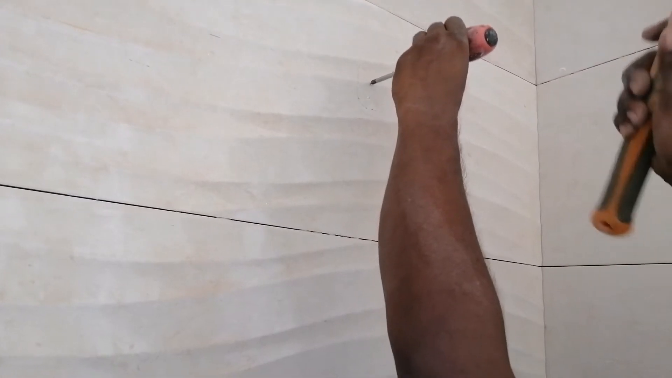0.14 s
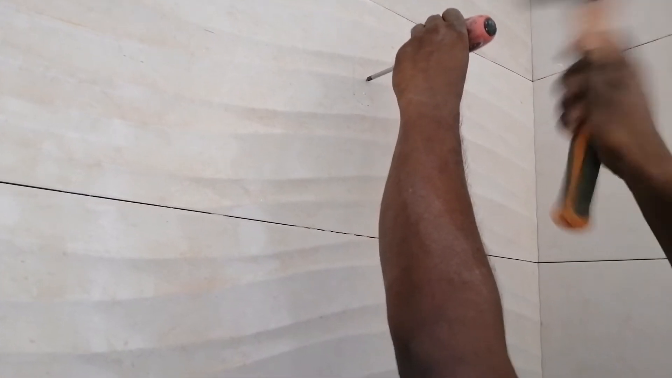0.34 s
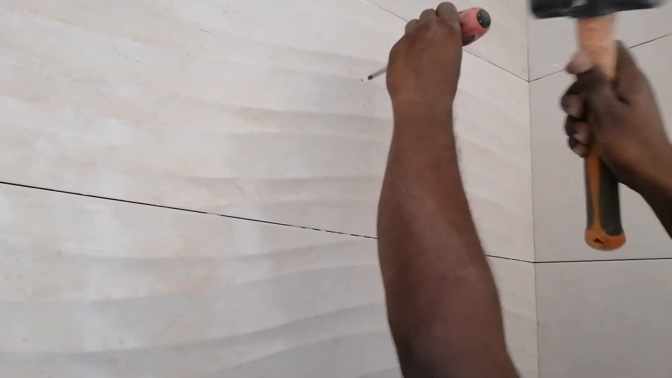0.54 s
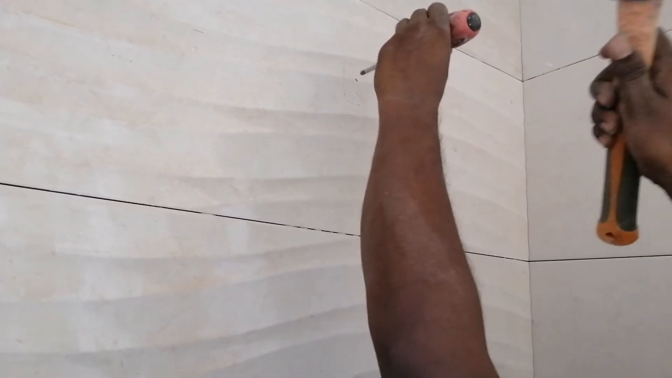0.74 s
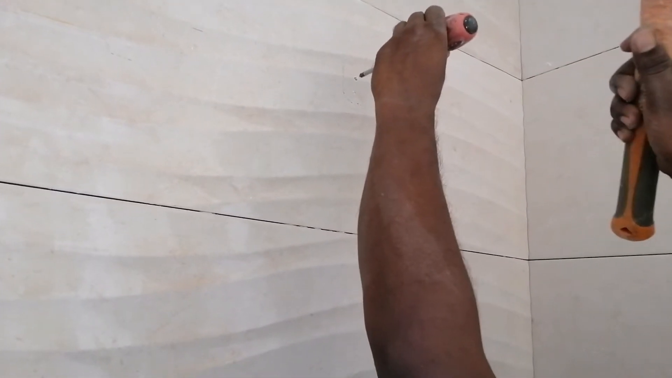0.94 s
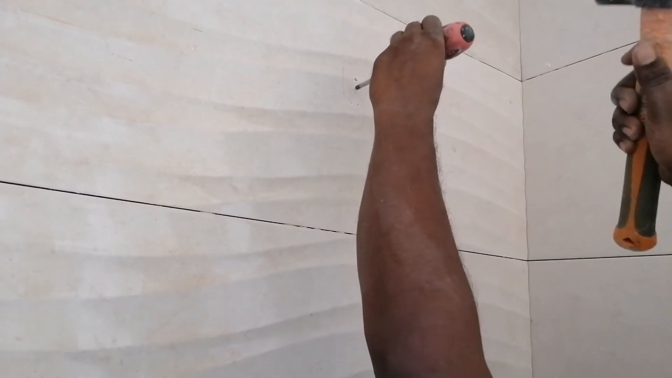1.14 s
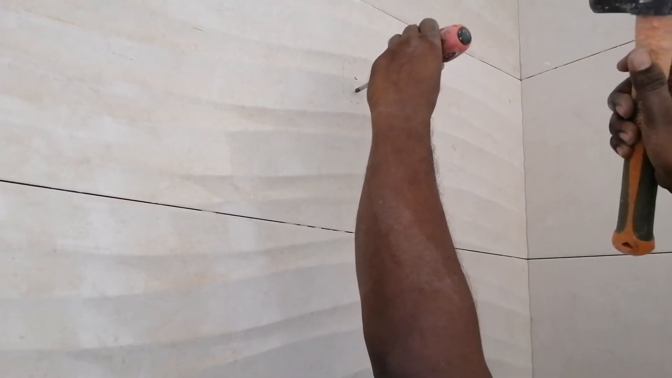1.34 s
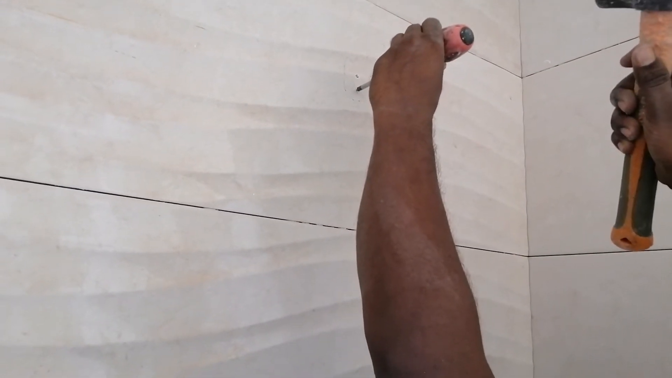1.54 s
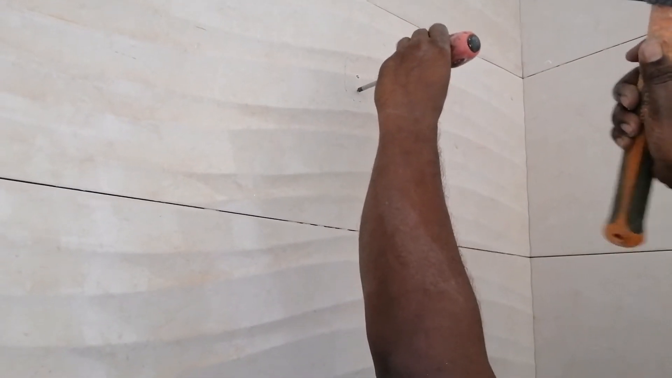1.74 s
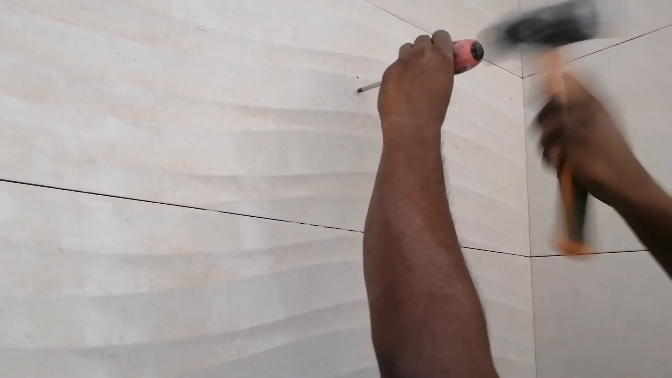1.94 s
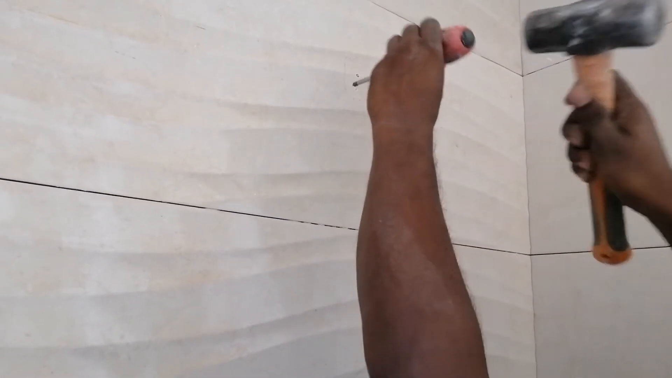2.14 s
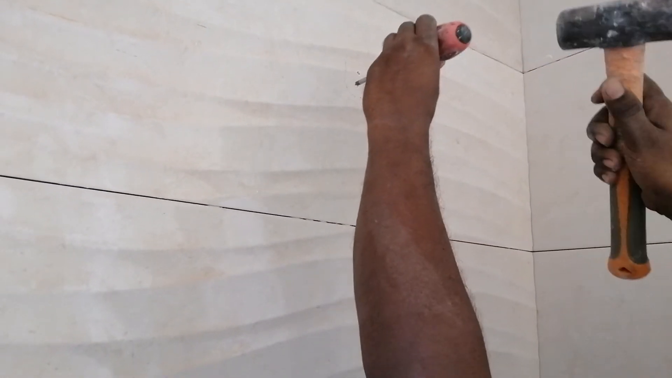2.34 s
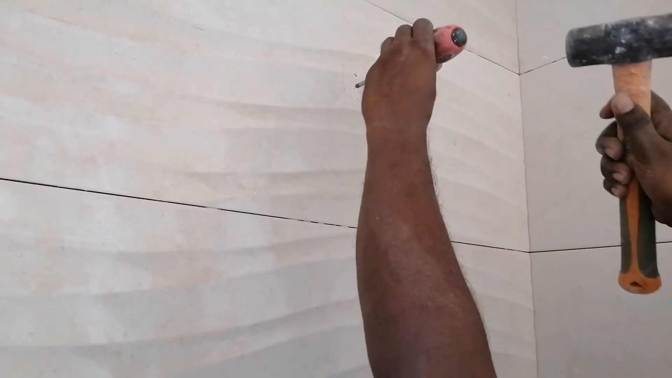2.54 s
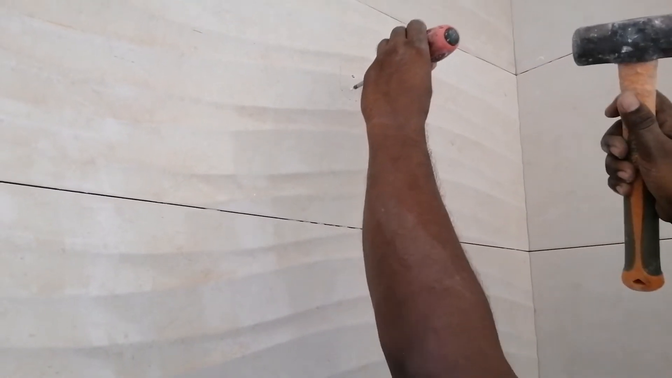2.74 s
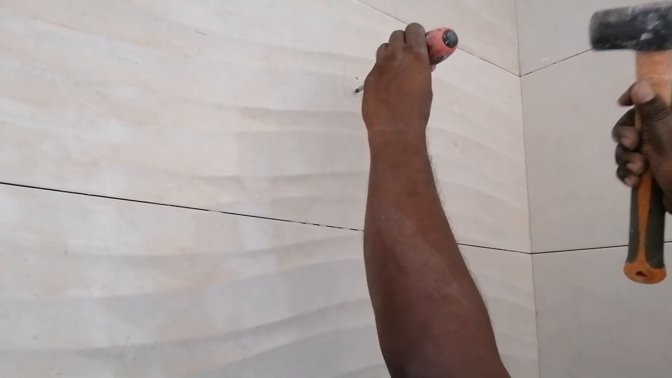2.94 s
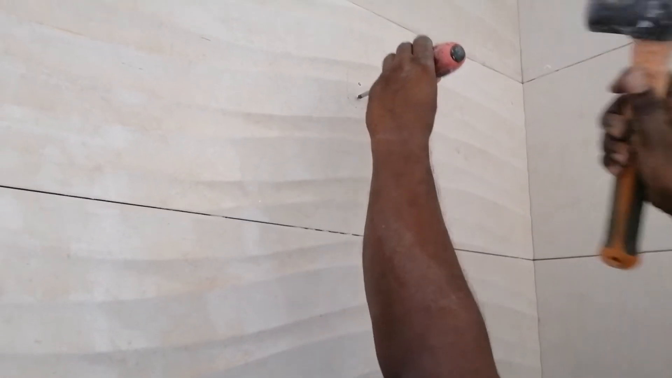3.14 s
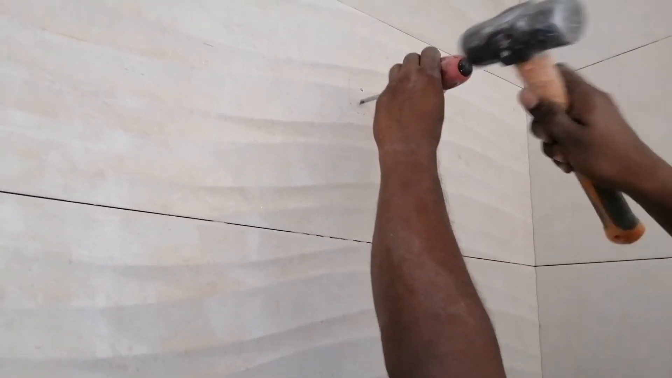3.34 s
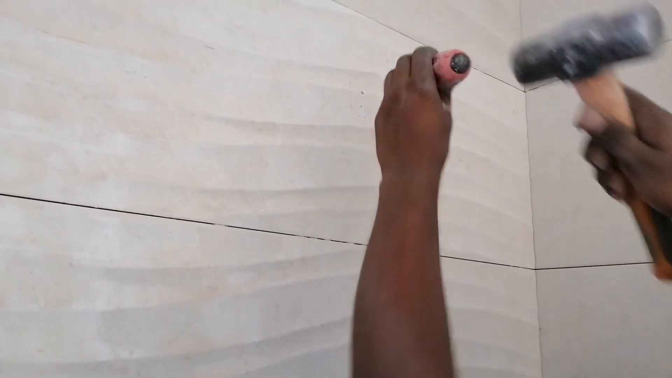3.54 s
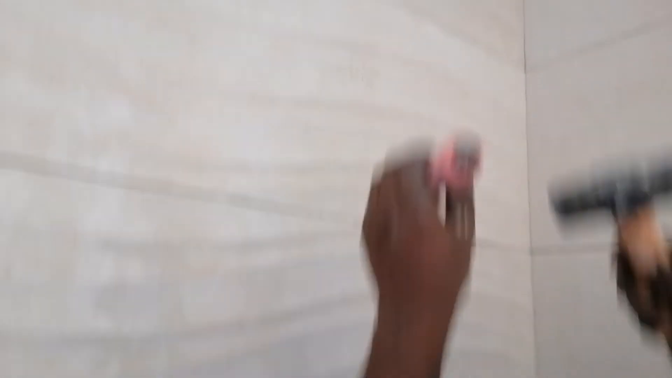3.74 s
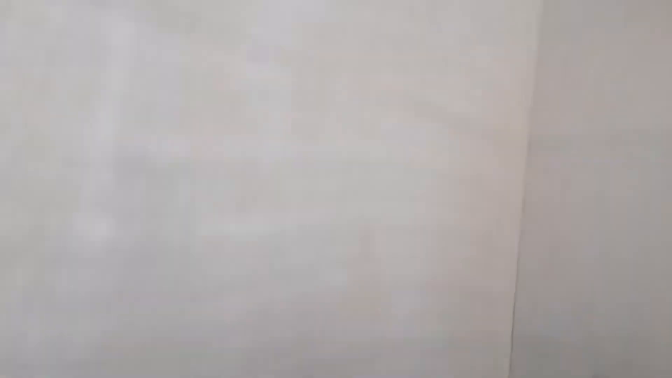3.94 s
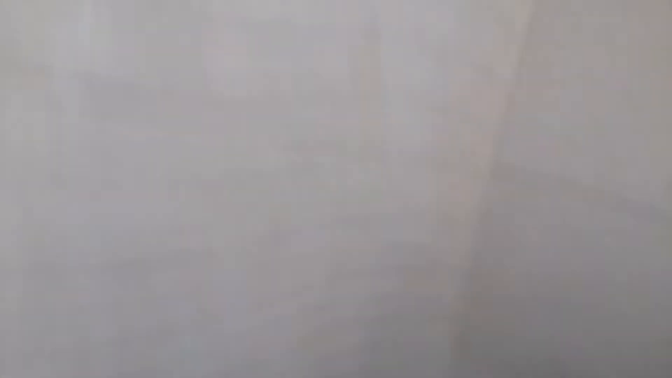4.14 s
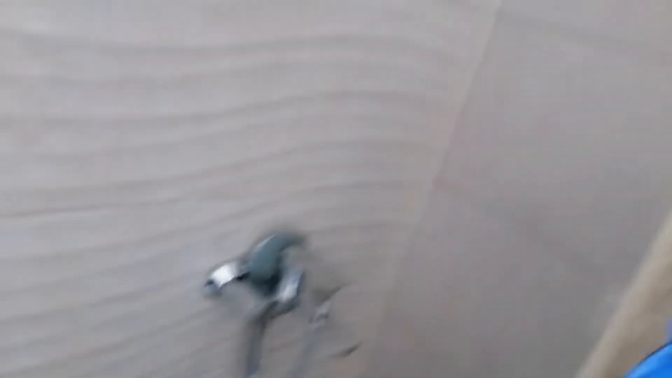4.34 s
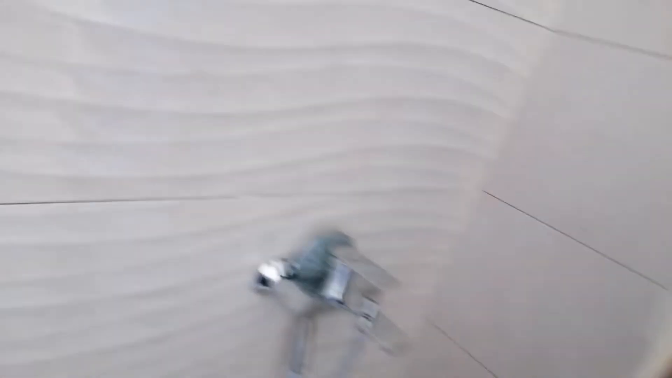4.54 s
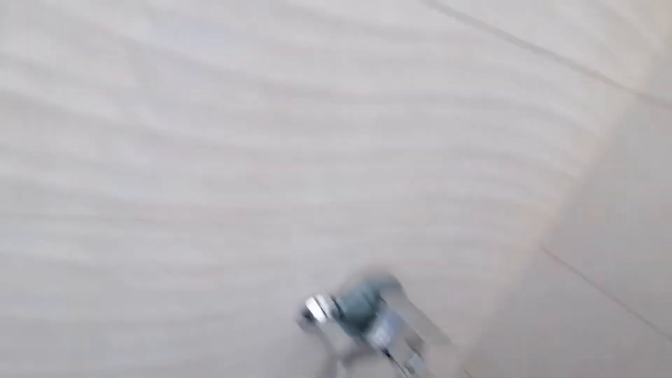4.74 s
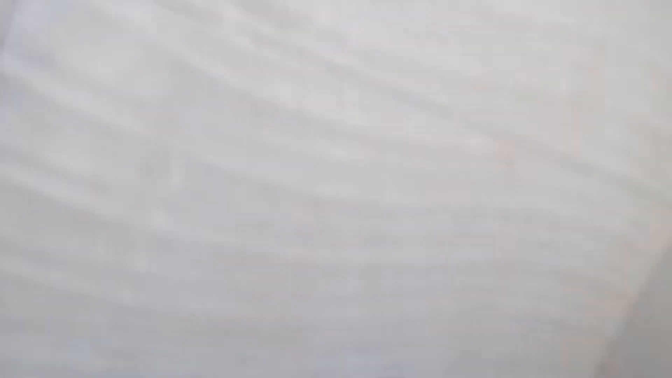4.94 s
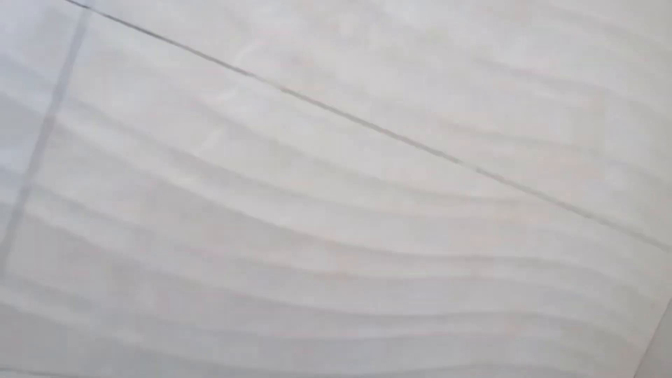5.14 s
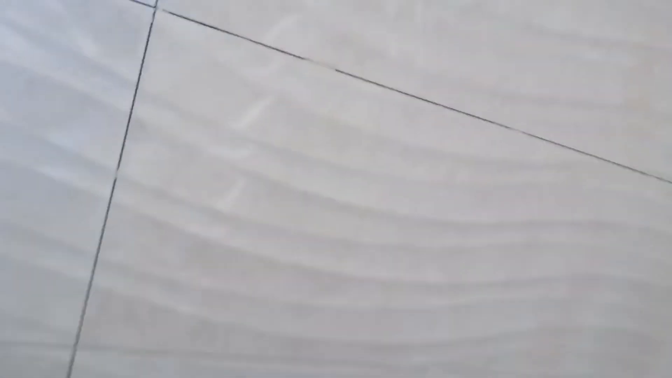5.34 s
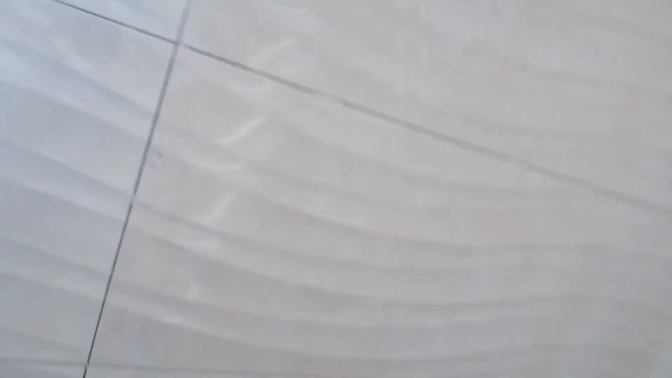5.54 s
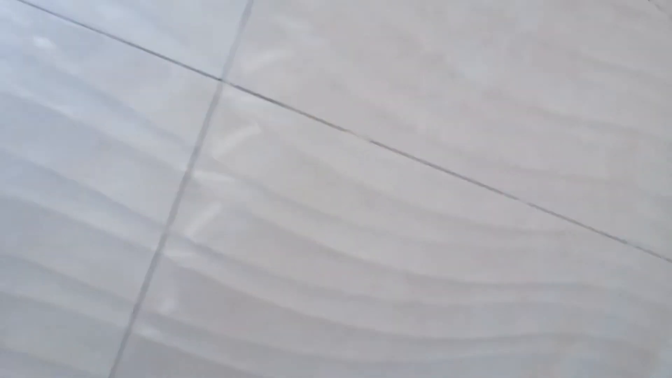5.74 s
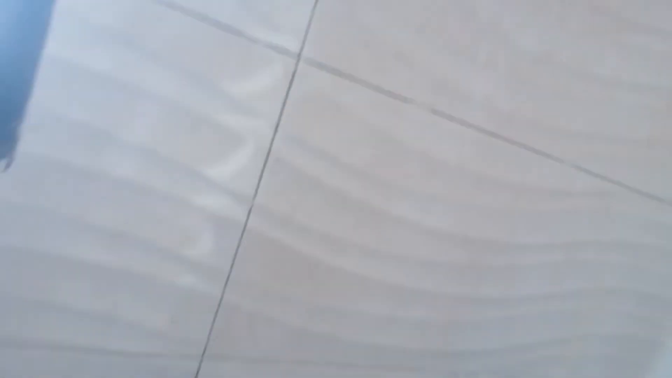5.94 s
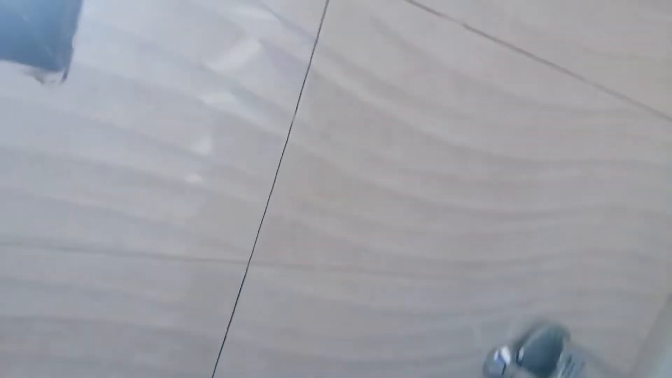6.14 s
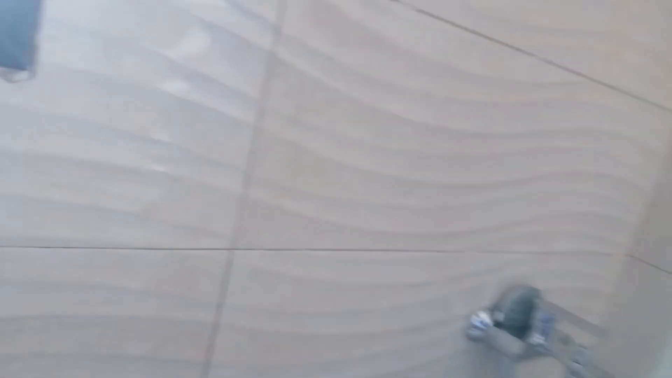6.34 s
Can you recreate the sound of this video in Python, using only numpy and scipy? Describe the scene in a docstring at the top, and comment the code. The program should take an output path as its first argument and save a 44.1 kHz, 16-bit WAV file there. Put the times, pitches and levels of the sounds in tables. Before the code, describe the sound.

A hammer taps a screwdriver held against a ceramic wall tile in a small bathroom, close by. The blows land at about 0.5, 2.1 and 3.4 seconds. Each is a sharp metallic clink with a tile clack and a light thud, followed by a short, bright echo and a low boom from the room; the third rings less. A few tiny ticks fall between them. From about 4 seconds tools are put down and handled, with small knocks, rustling cloth and scuffing feet, while something hollow drags softly over the floor. The loudest knock comes at about 5.6 seconds, followed by a quick cluster of sharp clicks near 5.9 and more rustling that fades just after 6 seconds. Very faint birds chirp outside between about 1 and 4.5 seconds, over a steady, dull room noise.

```python
"""A small tiled bathroom. A hammer drives a screwdriver against a wall tile: the shaft rings, the tile
clacks and thuds, and each blow booms in the room's standing waves. Then tools are put down, feet and
cloth scuff and knock, and something hollow drags over the floor. Faint birds chirp outside over a dull
room noise. Two microphone ports hear it, the left with a cavity that rings near 2.2 kHz, and a gain
control ducks the loud moments."""
import sys
import numpy as np
from scipy import signal
from scipy.fft import rfft, irfft, next_fast_len
from scipy.io import wavfile
from scipy.ndimage import uniform_filter1d, minimum_filter1d

SR = 44100
rng = np.random.default_rng(int(sys.argv[2]) if len(sys.argv) > 2 else 0)


def master(y):
    """Save y as 16-bit WAV."""
    cut = np.clip(np.atleast_2d(y).T, -1, 1)
    pcm = np.round(cut * 32767)  # scale
    wavfile.write(sys.argv[1], SR, pcm.astype(np.int16))


N = 286650
LONG = next_fast_len(N + 3 * SR)   # time wraps round, so earlier sound leaves its tail at the start


def from_db(db):
    """Decibels to gain."""
    return 10 ** (np.asarray(db) / 20)


def rms_one(x):
    """Scale to rms 1."""
    return x / np.sqrt(np.mean(x ** 2) + 1e-20)


def peak_one(x):
    """Scale to peak 1."""
    return x / np.abs(x).max()


def gesture(full_s, swell_s, hold_s, fade_db_per_s):
    """Envelope that rises 19.5 dB per swell_s up to full_s, holds, then fades."""
    t = np.arange(LONG) / SR - full_s
    swell_db = 19.5 * np.minimum(t / max(swell_s, .005), 0)
    fade_db = fade_db_per_s * np.maximum(t - hold_s, 0)
    return from_db(np.maximum(swell_db - fade_db, -200))


def at_hz(points, hz):
    """Read a curve on a log frequency axis."""
    return np.interp(np.log(hz), np.log(np.array(points)[:, 0]), np.array(points)[:, 1])


def band(x, low_hz, high_hz, order=2):
    """Butterworth band-pass."""
    edges = np.clip([low_hz, high_hz], 15, [.4 * SR, .45 * SR])
    return signal.sosfilt(signal.butter(order, edges, "band", fs=SR, output="sos"), x)


def resonance(x, hz, width_hz):
    """Two-pole resonance, gain 1 at its peak."""
    r = np.exp(-np.pi * width_hz / SR)
    gain = (1 - r * r) / 2
    return signal.lfilter([gain, 0, -gain], [1, -2 * r * np.cos(2 * np.pi * hz / SR), r * r], x)


def steep_resonance(x, hz, width_hz):
    """The same resonance twice over, for steeper skirts."""
    return resonance(resonance(x, hz, width_hz), hz, width_hz)


def add(bus, start_s, sound):
    """Mix a short sound into a bus."""
    bus[(round(start_s * SR) + np.arange(len(sound))) % LONG] += sound


def room_noise():
    """Steady dull bed of building and street noise."""
    # Noise spectrum: frequency_hz, relative_db
    spectrum = [(15, -35.5), (25, -14), (43, 0.5), (54, -8), (93, -7), (121, -16.5), (196, -8), (278, -15),
                (383, -10), (427, -13.5), (2130, -28.5), (3350, -40.5), (5140, -40.5), (15000, -77)]
    hz = np.maximum(np.arange(LONG // 2 + 1) * SR / LONG, 1)
    noise = irfft(rfft(rng.standard_normal(LONG)) * from_db(at_hz(spectrum, hz)), LONG)
    return from_db(-57) * rms_one(noise)


def rumble():
    """Deep noise, mostly shared by the two ports."""
    deep = from_db(-68) * rms_one(band(rng.standard_normal((3, N)), 18, 40))
    return .45 * deep[:2] + deep[2]


def hammer_blows():
    """The shaft rings until the fist damps it; the tile clacks, thuds and cracks, mostly into the room."""
    # Blows, the first just before the start: start_s, shaft_hz, then relative levels
    # ring_db, clack_db, thud_db, crack_db
    blows = [(-.45, 2240, -30, -21, -17, -41), (0.5125, 2514, -11.5, -11.5, -19, -18.5),
             (2.0781, 2360, -15, -14, -18.5, -22), (3.444, 2230, -26.5, -12, -21.5, -54)]
    ring_s, crack_hz = .0045, (900, 6700)
    direct, send, wall_push = np.zeros((3, LONG))
    t = np.arange(SR // 10) / SR
    click = 1. * (t == 0) + 1e-18
    contact = np.sin(np.pi * np.minimum(t / ring_s, 1))
    thud = peak_one(steep_resonance(click, hz=365, width_hz=373))
    crack = peak_one(band(click, *crack_hz, order=1))
    chips = peak_one(band(rng.standard_normal(len(t)) * contact, *crack_hz, order=1))
    low_tile_mode = from_db(-6) * peak_one(resonance(click, hz=1560, width_hz=670))
    for start_s, shaft_hz, ring_db, clack_db, thud_db, crack_db in blows:
        ring = from_db(ring_db) * contact * np.sin(2 * np.pi * shaft_hz * t)
        clack = from_db(clack_db) * (peak_one(resonance(click, shaft_hz, width_hz=696)) - low_tile_mode)
        tile = clack + from_db(thud_db) * thud + from_db(crack_db) * crack
        add(direct, start_s, ring + from_db(thud_db - 7.5) * thud + from_db(crack_db - 2.5) * chips)
        add(send, start_s, from_db(-35.5) * ring + tile)
        add(wall_push, start_s, from_db(thud_db - 2.5) * click)
    return direct, send, wall_push


def tile_reverb(send):
    """Hard walls throw back a diffuse stereo tail that dies band by band."""
    # Decay of the tail: frequency_hz, t60_s
    decay = [(60, 1.3), (160, 1.85), (420, 0.8), (1100, 0.84), (2910, 0.73), (7680, 0.56)]
    # Colour of the tail: frequency_hz, relative_db
    colour = [(40, -27.5), (100, 1), (300, 0), (1000, 5.5), (3000, 8.5), (8000, 12), (15000, -18.5)]
    # Likeness of left and right: frequency_hz, correlation
    likeness = [(60, 0.15), (300, 1), (600, 0.1), (1200, 0.36), (3000, -0.28), (12000, 0.13)]
    first_echo_s = .004
    t = np.arange(2 * SR) / SR
    tail = np.zeros((2, len(t)))
    edges_hz = 40 * 2 ** np.arange(0, 9, .5)
    white = rng.standard_normal((2, 2, len(t)))
    for k, (low, high) in enumerate(zip(edges_hz, edges_hz[1:])):
        hz = np.sqrt(low * high)
        mid, side = band(white[k % 2], low, high)
        alike = at_hz(likeness, hz)
        envelope = from_db(at_hz(colour, hz) - 60 * t / at_hz(decay, hz))
        tail += envelope * (np.sqrt(1 + alike) * mid + np.sqrt(1 - alike) * side * [[1], [-1]])
    tail *= np.clip(t / first_echo_s - .5, 0, 1)   # silent until the nearest wall answers
    tail /= np.sqrt(np.mean(np.sum(tail ** 2, axis=1)))
    return irfft(rfft(send) * rfft(tail, LONG), LONG)


def room_boom(push):
    """A shaken wall or floor drives standing waves; each builds, hangs on, then drops away faster."""
    # Lowest room modes: pitch_hz, level_db, early_t60_s
    modes = [(76.4, -6, 0.99), (83.7, -8, 1.9), (97.5, -14, 1.2), (121, -6.5, 1.07), (162.5, -6.5, 1.12),
             (191, -4, 1.285), (216.7, -10, 1.27), (255.3, -3, 0.69), (318, -9.5, 0.48),
             (379.5, -5.5, 0.19), (428.6, -8.5, 1.08)]
    build_cycles, hang_s, drop_db_per_s = 2.5, .35, 41
    t = np.arange(2 * SR) / SR
    drop_db = drop_db_per_s * np.maximum(t - hang_s, 0)
    response = np.zeros((2, len(t)))
    for hz, level_db, t60_s in modes:
        swell = 1 - np.exp(-t * hz / build_cycles)
        phase = 2 * np.pi * (hz * t + rng.random()) + rng.normal(0, .37, (2, 1))   # offset at each port
        response += from_db(level_db - 60 * t / t60_s - drop_db) * swell * np.sin(phase)
    return irfft(rfft(push) * rfft(response, LONG), LONG)


def birds():
    """Far chirps smeared by echoes: narrow noise riding a sagging pitch, broken up by a flutter."""
    # Notes through the walls: full_s, hold_s, pitch_hz, relative_db
    chirps = [(1.023, 0.16, 5680, -81), (1.258, 0.034, 5170, -70.5), (1.347, 0.019, 4820, -70.5),
              (1.392, 0.12, 3930, -82), (1.549, 0.021, 5110, -81), (2.484, 0.035, 5230, -74),
              (2.585, 0.02, 4890, -71.5), (2.629, 0.074, 3910, -77), (2.945, 0.12, 5850, -79),
              (4.187, 0.16, 5150, -72), (4.4, 0.017, 5260, -53), (4.487, .03, 5800, -63.5)]
    width_hz, sag_hz_per_s, flutter_db = 450, 550, 3.5
    song, t = np.zeros(LONG), np.arange(LONG) / SR
    lowpass = signal.butter(2, width_hz / 2, fs=SR, output="sos")
    blur = rms_one(signal.sosfilt(lowpass, rng.standard_normal((2, LONG))))
    for full_s, hold_s, hz, level_db in chirps:
        phase = 2 * np.pi * (hz - sag_hz_per_s * (t - full_s) / 2) * (t - full_s)
        envelope = gesture(full_s, swell_s=.067, hold_s=hold_s, fade_db_per_s=134)
        song += from_db(level_db) * envelope * (blur[0] * np.cos(phase) + blur[1] * np.sin(phase))
    flutter = rms_one(band(rng.standard_normal(LONG), 9.8, 50))
    return song * from_db(flutter_db * flutter)


def knocks():
    """Tools and feet make short rough contacts, each coloured round its pitch, and push on the floor."""
    # Knocks and ticks, a row per colour: start_s, peak_db, pitch_hz, width_octaves, send_db, boom_db
    contacts = [(1.031, -54.5, 11000, 3.6, 11, -84), (1.21, -63, 8350, 3.3, 21, -72),
                (1.582, -35.5, 13300, 0.54, 7, -62), (2.933, -40.5, 2540, 0.16, -4, -60.5),
                (2.935, -36.5, 1130, 2.9, 6, -58), (4.005, -30, 417, 2.1, 8.5, -41),
                (4.002, -32, 1340, 0.82, -12, -62), (4.499, -35, 1200, 5.17, 18, -53.5),
                (4.738, -37, 990, 1.67, 11.5, -56.5), (4.794, -25.5, 2700, 3.5, 9.5, -59),
                (4.902, -52, 2172, 2.9, 6, -71), (5.109, -34.5, 890, 0.78, 4, -56.5),
                (5.11, -33, 4400, 1.33, 13.5, -82), (5.17, -33.5, 3870, 1.5, 10.5, -64),
                (5.23, -38.5, 2470, 1.06, -9, -81), (5.504, -34, 3940, 2.1, 9, -65),
                (5.567, -13, 757, 0.97, 8.5, -36.5), (5.569, -20, 2220, 0.75, 6, -78),
                (5.825, -16, 6400, 1.3, 3.5, -53.5), (5.847, -20.5, 2100, 1.11, 12, -49),
                (5.92, -20, 3040, 2.1, -5, -50), (6.258, -32, 3050, 2.4, -26, -73)]
    direct, send, floor_push = np.zeros((3, LONG))
    t = np.arange(SR // 20) / SR
    click = 1. * (t == 0) + 1e-18
    for start_s, peak_db, hz, octaves, send_db, boom_db in contacts:
        spread = 2 ** (max(octaves, .2) / 2)
        edges_hz = hz / spread, hz * spread
        rough = rng.standard_normal(len(t)) * np.exp(-t / .0023)
        add(direct, start_s, from_db(peak_db) * peak_one(band(rough, *edges_hz)))
        add(send, start_s, from_db(peak_db + send_db) * peak_one(band(click, *edges_hz)))
        add(floor_push, start_s, from_db(boom_db) * click)
    return direct, send, band(floor_push, 105, 2000)   # the stiff floor barely drives the deepest modes


def scuffs():
    """Cloth and soles rub in dense uneven grains of friction; two unrelated layers, mid and side."""
    # Strokes: full_s, swell_s, hold_s, relative_db, fade_db_per_s, brightness_octaves, spread_octaves
    strokes = [(3.973, 0.23, .015, -49.5, 300, 0.99, 2), (4.397, 0.14, .15, -45, 90, 2.65, 0.67),
               (4.515, .03, 0.023, -53, 95, 1.3, 0.53), (4.815, 0.063, 0.0067, -28, 91, 1.69, 1.6),
               (5.137, 0.06, 0.061, -48.5, 67, 2.1, 1), (5.527, 0.26, 0.17, -39, 53, 1.8, 1.75),
               (5.846, 0.011, 0.0076, -33, 107, 1.5, 1.9), (6.046, 0.3, 0.069, -34, 65, 1.14, 1.7),
               (6.342, 0.076, 0.018, -51.5, 69, 2.8, 0.79)]
    grains_per_s = 9000
    sizes = from_db(3.74 * np.minimum(rng.exponential(1, LONG), 5)) * rng.standard_normal((2, LONG))
    grains = sizes * (rng.random((2, LONG)) < grains_per_s / SR)
    centres = np.linspace(-1, 3.67, 8)   # octaves above 1 kHz, like the brightness
    power = np.zeros((len(centres), 1, LONG))
    for full_s, swell_s, hold_s, level_db, fade_db_per_s, brightness, spread in strokes:
        weights = np.exp(-((centres - brightness) / spread) ** 2)
        envelope = from_db(level_db) * gesture(full_s, swell_s, hold_s, fade_db_per_s)
        power[:, 0] += np.outer(weights / weights.sum(), envelope ** 2)
    bands = [rms_one(band(np.roll(grains, k, axis=0), 790 * 2 ** octave, 1260 * 2 ** octave))
             for k, octave in enumerate(centres)]
    rub = np.sum(np.sqrt(power) * bands, axis=0)
    return rub + from_db(-2) * resonance(rub, hz=2350, width_hz=380)   # the rubbed surface rings


def hollow_drag():
    """Friction on the floor excites the two modes of a hollow body."""
    # Drags: full_s, swell_s, hold_s, low_mode_db, upper_mode_db
    drags = [(4.003, 0.017, 0.011, -41, -49.5), (4.233, 0.11, .02, -49.5, -73),
             (4.86, 0.045, 0.01, -59, -50), (5.172, 0.26, 0.5, -63.5, -67.5),
             (5.607, 0.049, 0.053, -45.5, -40.5), (5.976, 0.074, 0.022, -48.5, -43),
             (6.11, .12, .04, -53, -54.5)]
    # Body modes: pitch_hz, width_hz
    body = [(124, 33), (330, 103)]
    friction = band(rng.standard_normal(LONG), 105, 600)
    modes = [rms_one(steep_resonance(friction, hz, width_hz)) for hz, width_hz in body]
    gains = sum(np.outer(from_db(levels_db), gesture(full_s, swell_s, hold_s, fade_db_per_s=90.5))
                for full_s, swell_s, hold_s, *levels_db in drags)
    return np.sum(gains * modes, axis=0)


def gain_control(x):
    """Loud moments pull the gain down fast; it holds a moment, then climbs back."""
    threshold_db, cut_db_per_db = -27.5, .68
    attack_s, hold_s, release_db_per_s = .0054, .1, 27.5
    power = uniform_filter1d(np.mean(x ** 2, axis=0), size=441, origin=220)   # over the last 10 ms
    cut_db = cut_db_per_db * np.maximum(10 * np.log10(power + 1e-12) - threshold_db, 0)
    half_hold = int(hold_s * SR / 2)
    held_db = -minimum_filter1d(-cut_db, size=2 * half_hold + 1, origin=half_hold)
    climb_db = release_db_per_s * np.arange(N) / SR
    released_db = np.maximum.accumulate(held_db + climb_db) - climb_db
    pole = np.exp(-1 / (attack_s * SR))
    return x * from_db(-signal.lfilter([1 - pole], [1, -pole], released_db))


def scene():
    """Stereo mix of the direct sounds, the reverb and boom of the room, and the rumble."""
    hammer, hammer_send, wall_push = hammer_blows()
    knock, knock_send, floor_push = knocks()
    scuff, scuff_side = scuffs()
    song = birds()
    send = from_db(14) * hammer_send + knock_send + from_db(-9.5) * scuff + from_db(3) * song
    room = tile_reverb(send + room_noise()) + room_boom(wall_push + floor_push)
    bed = rumble()
    direct = hammer + knock + from_db(-9) * scuff + from_db(6.5) * song
    direct = np.array([np.roll(direct, 12), direct])   # left lags: the action is nearer the right port
    direct += from_db(-19.2) * scuff_side * [[1], [-1]]
    return (direct + room + hollow_drag())[:, :N] + bed


def record(dry):
    """Two hissing capsules behind ringing ports, then gain control, rounded peaks and a top cut."""
    cavity_hz, cavity_width_hz, dull_hz, cutoff_hz = 2224, 534, 13030, 15800
    left, right = dry + from_db(-86) * rng.standard_normal((2, N))
    # the left port's cavity rings and dulls the top
    cavity = resonance(resonance(left, cavity_hz, cavity_width_hz), cavity_hz, 4.8 * cavity_width_hz)
    left = signal.sosfilt(signal.butter(1, dull_hz, fs=SR, output="sos"), left + from_db(6) * cavity)
    both = np.array([left, right]) * from_db([[1.23], [-1.23]])
    both += from_db(-6.5) * resonance(both, hz=5440, width_hz=1300)   # presence lift of both ports
    rounded = 1.655 * np.tanh(gain_control(both) / 1.274)
    return signal.sosfilt(signal.cheby2(12, 60, cutoff_hz, fs=SR, output="sos"), rounded)


dry = scene()
out = record(dry)
master(out)
```